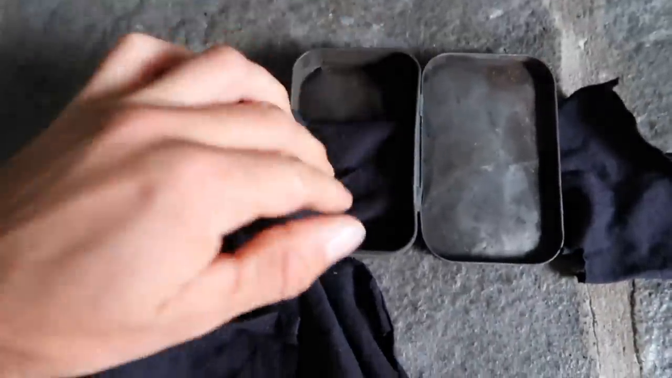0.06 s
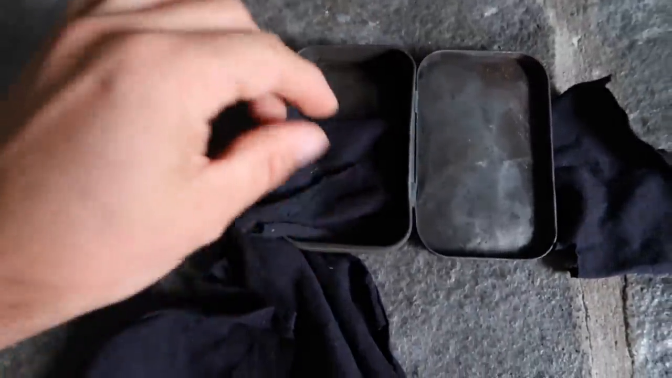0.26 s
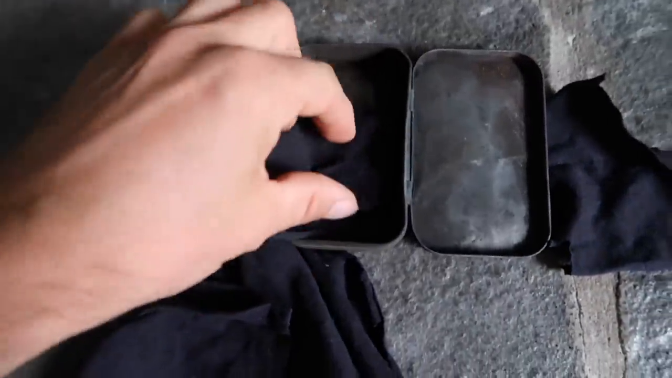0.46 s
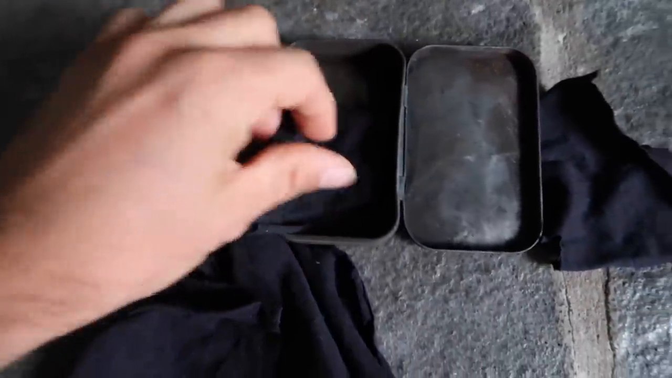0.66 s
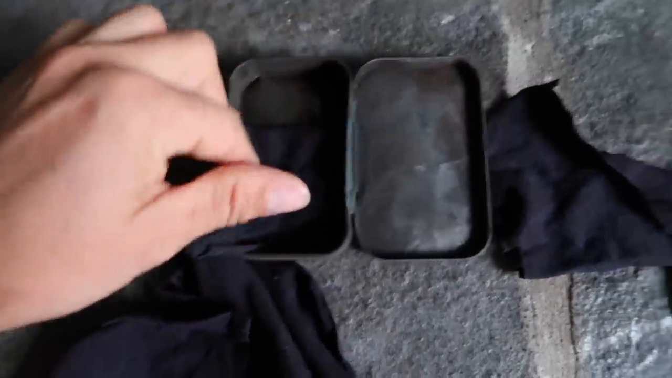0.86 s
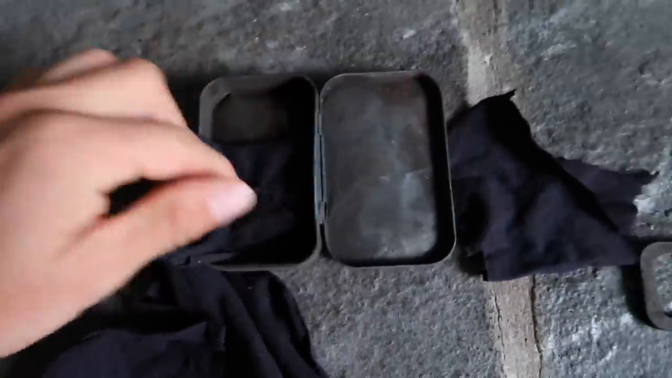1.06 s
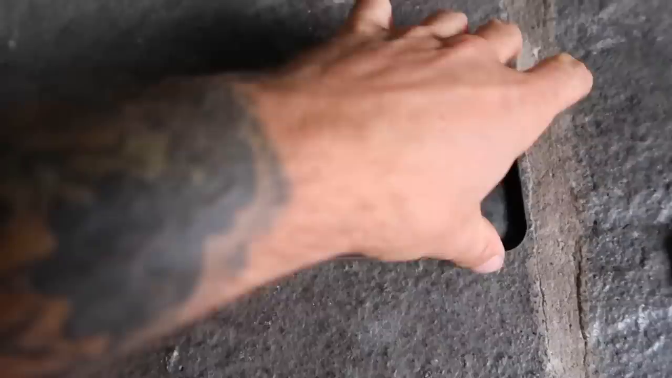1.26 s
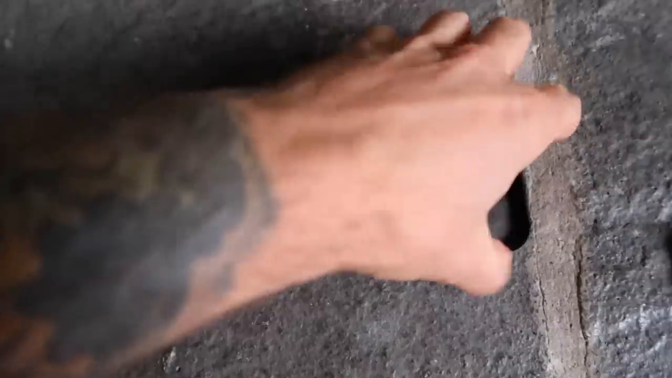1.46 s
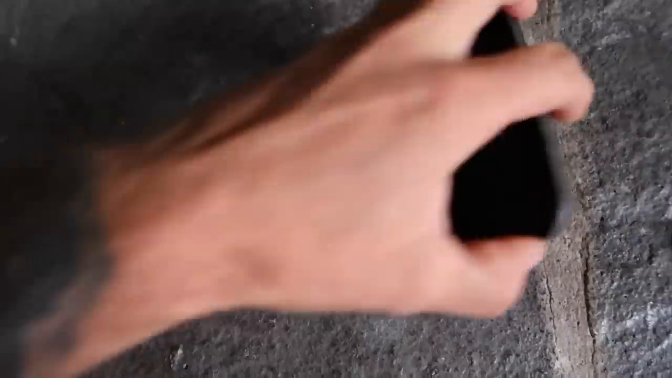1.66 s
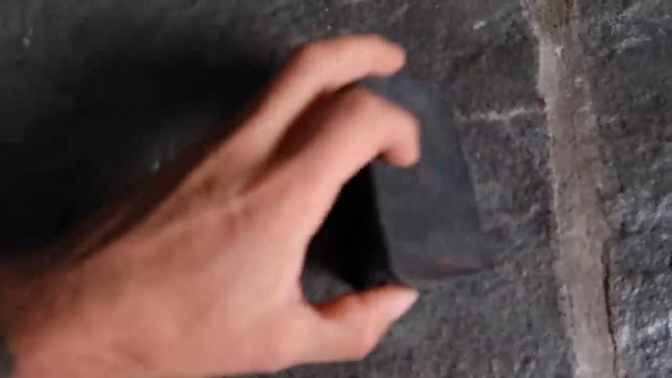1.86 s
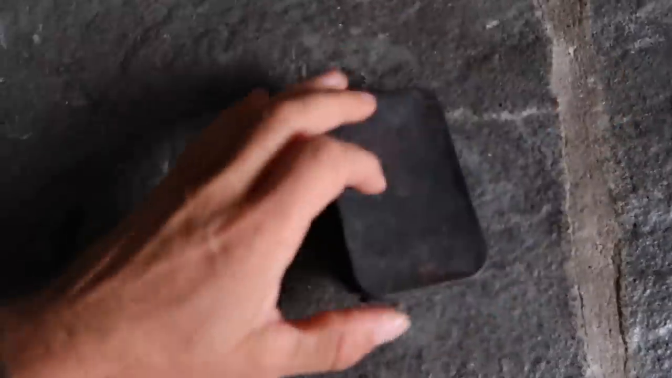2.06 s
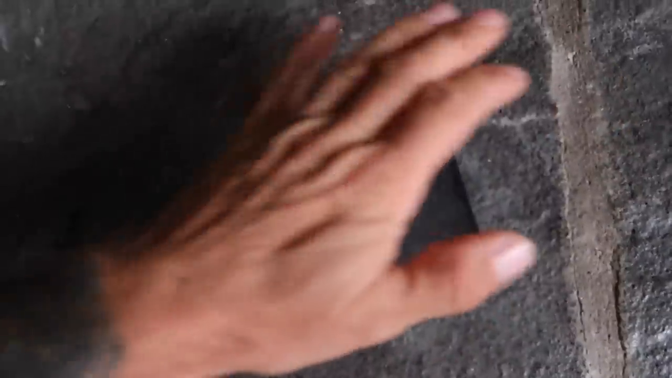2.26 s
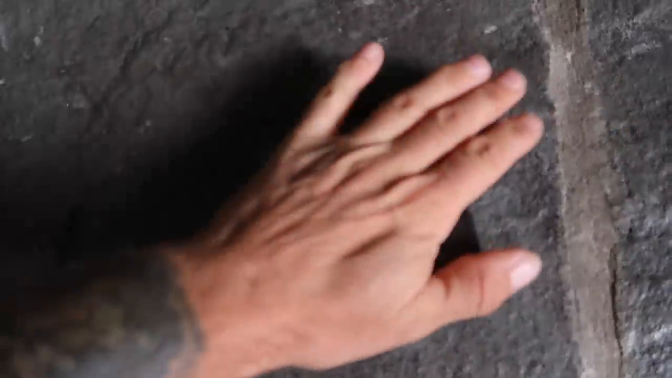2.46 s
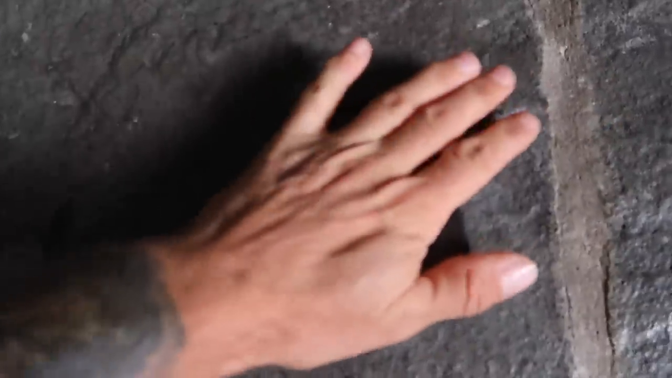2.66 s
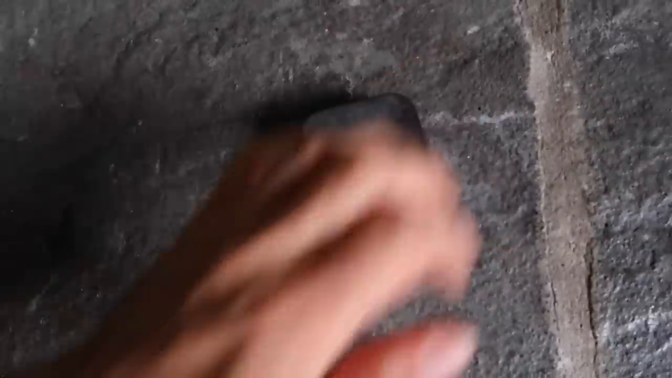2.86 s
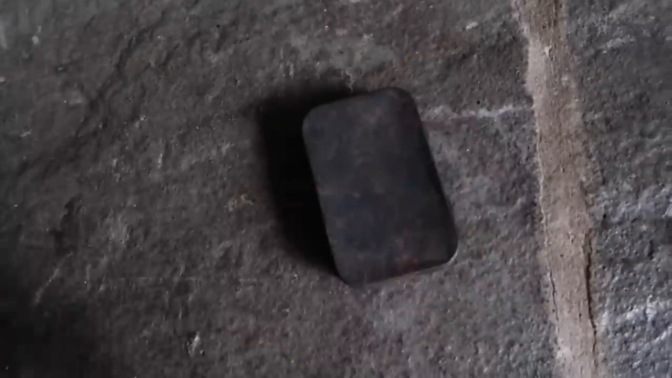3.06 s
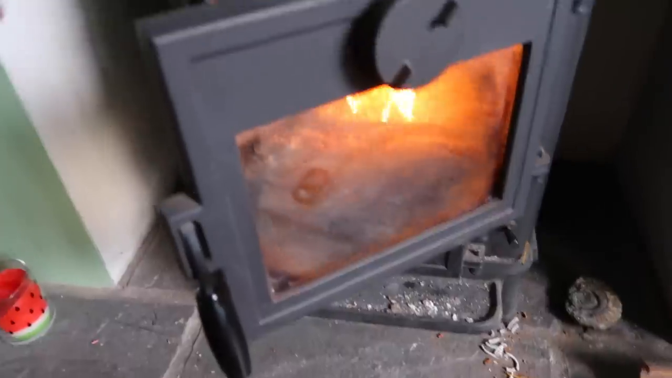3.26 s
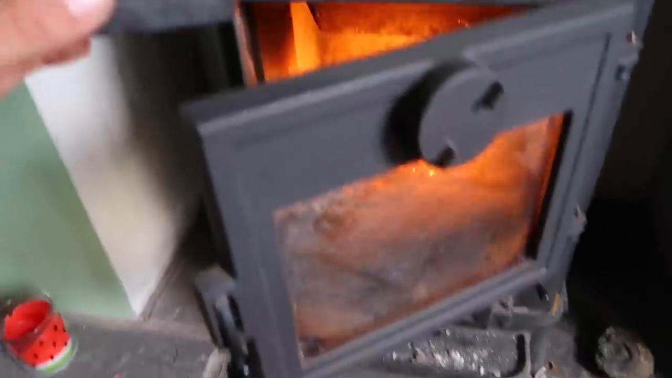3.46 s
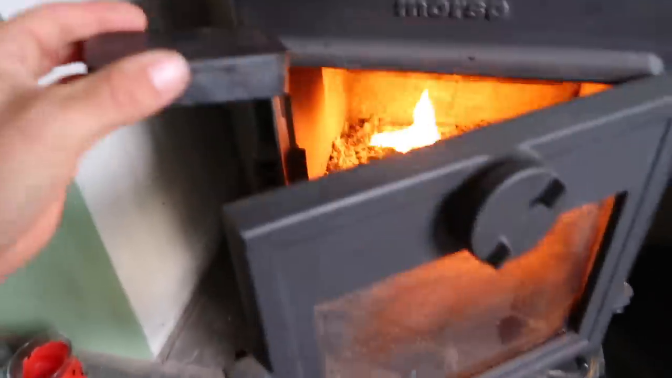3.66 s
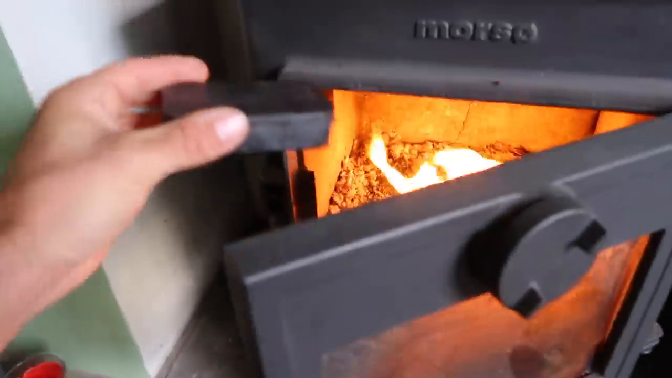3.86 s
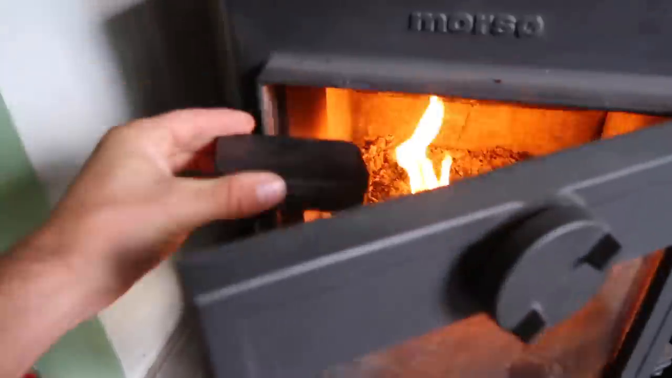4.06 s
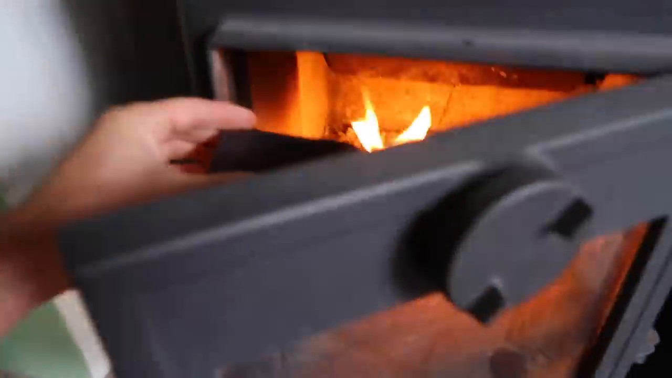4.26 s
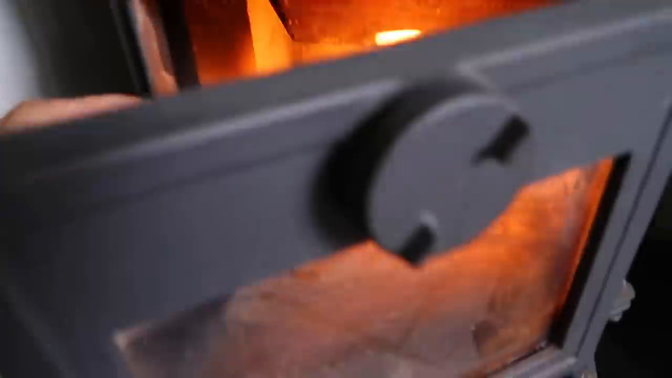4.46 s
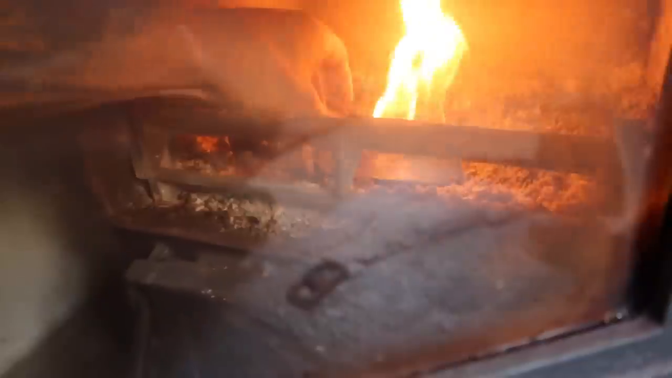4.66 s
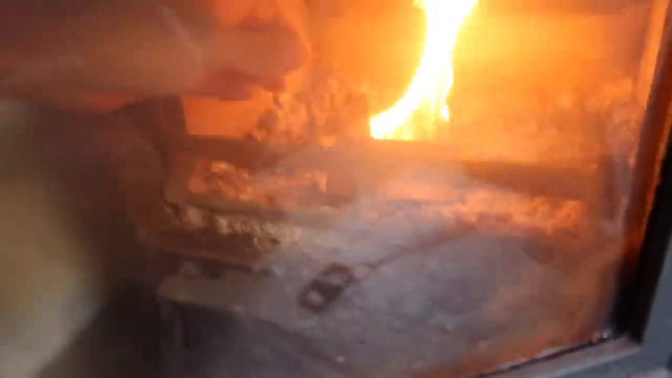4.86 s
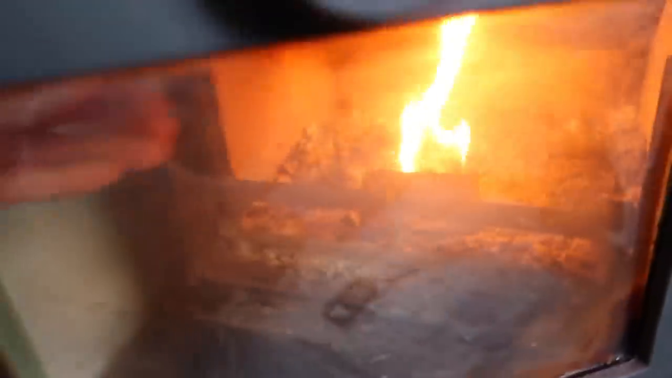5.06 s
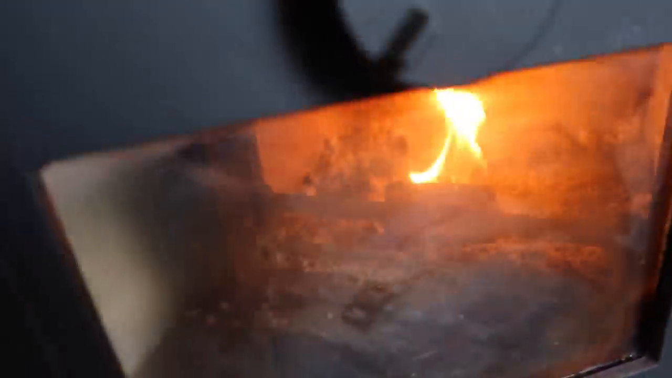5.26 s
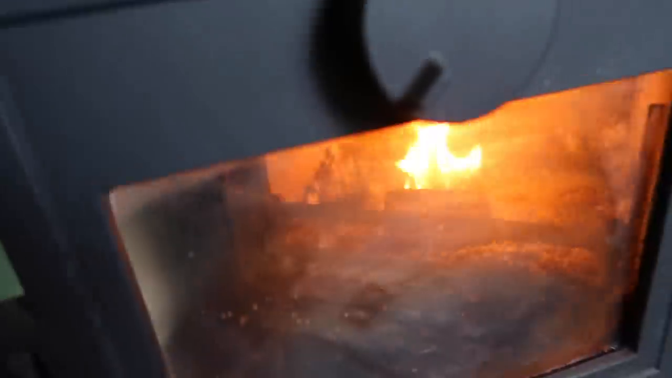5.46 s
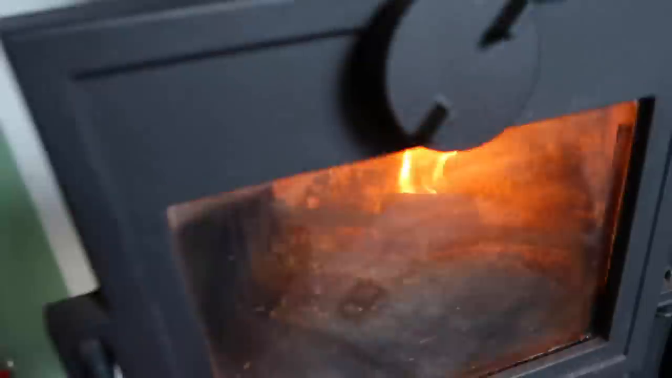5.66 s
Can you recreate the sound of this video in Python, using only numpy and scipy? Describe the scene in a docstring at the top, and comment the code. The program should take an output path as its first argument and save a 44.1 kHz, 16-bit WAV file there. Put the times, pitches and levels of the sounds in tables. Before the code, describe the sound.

A small room with quiet, soft room tone and a barely perceptible very high whine. Until about 0.8 s there is almost nothing but a faint tick and a light scrape. At 0.85-0.95 s a tin lid clacks in a quick, bright cluster. From 1.5 to 2.2 s come irregular thin sheet-metal knocks and sliding scrapes, with short high squeaks near 1.65, 1.73 and 1.87 s. At 2.45-2.6 s the lid is pressed shut with duller, hollow clicks and a small thump on stone; a last knock falls at 2.8 s. From 3.1 s fluttering low handling rumble, soft hiss and faint fire crackle appear. At 4.7 s iron knocks, then at 4.84 s the heavy stove door slams, by far the loudest event, cutting off the fine crackle and leaving a low, beating metallic hum around 400 Hz. Faint handle rubs and dull clicks follow at 5.4-5.7 s.

```python
"""A small metal tin on a stone hearth, close by: its lid knocks, scrapes, squeaks and is pressed shut.
Then it goes into a burning wood stove, whose cast-iron door knocks, clunks shut and rings on.
Tin and door are bursts of contact noise filtered by plate resonances; squeaks and ring are sines.
Random clicks give the crackle of the wood, noise the low rumble of the handled camera and a soft hiss.
Under them lie the tone of a small room, as coloured noise, and a faint, very high tone.
"""
import sys
import numpy as np
from scipy import signal
from scipy.fft import rfft, irfft
from scipy.io import wavfile
from scipy.ndimage import uniform_filter1d, minimum_filter1d

SR = 44100
rng = np.random.default_rng(int(sys.argv[2]) if len(sys.argv) > 2 else 0)


def store_wav(level_fs):
    """Save 16-bit WAV to argv[1]."""
    pcm = np.round(np.clip(np.atleast_2d(level_fs), -1, 1) * 32767)
    wavfile.write(sys.argv[1], SR, pcm.T.astype(np.int16))


N = 251811

# the door comes home [s]
SLAM_S = 4.839


def tin():
    """Knocks and strokes ring the same sheet steel; the rim squeaks, and the closed tin thumps on the stone."""
    # knocks of lid and tin: (time [s], level [dB], rattle t60 [s], grip [dB], brightness [dB],
    # favoured ring [Hz])
    tin_knocks = [ (0.042, -46, 0.11, -5, 11.5, 3650), (0.8516, -28, 0.07, 1, -7, 1540),
                  (0.873, -17.5, 0.13, 3.5, -4.5, 1540), (0.904, -14.5, 0.12, 0, 5, 1380),
                  (0.920, -17.5, 0.18, -11, 10.5, 2830), (0.931, -6.5, 0.021, 5, -3, 1990),
                  (0.9359, -11.5, 0.065, -8, 16, 1800), (1.034, -33.5, .05, -4.5, -8, 1180),
                  (1.477, -19, 0.066, -5.5, -1, 3040), (1.5462, -13.5, 0.079, -8, -4.5, 1924),
                  (1.611, -25, 0.19, -1.5, 2, 2120), (1.6377, -17.5, 0.14, -4.5, 1, 1953),
                  (1.746, -22.5, 0.084, 4, -8.5, 1776), (1.8666, -14.5, 0.07, -5, 0.5, 1800),
                  (1.953, -35.5, 0.024, -11.5, -17, 1250), (1.999, -12.5, 0.096, 4, 4.5, 2163),
                  (2.0209, -12.5, 0.069, 2.5, 1, 1230), (2.076, -19.5, 0.047, 0.5, 0.5, 982),
                  (2.118, -28.5, 0.16, 11.5, -6, 986), (2.1668, -16.5, 0.083, 7.5, -4.5, 1788),
                  (2.457, -31.5, 0.11, 29, -21.5, 960), (2.4828, -12.5, 0.011, 29.5, -1.5, 1010),
                  (2.489, -18, 0.015, 17, 2.5, 1557), (2.510, -21, 0.048, 32, 4, 880),
                  (2.5236, -17, 0.031, 13.5, 6, 1736), (2.560, -21.5, .08, 25.5, -0.5, 726),
                  (2.598, -20.5, 0.039, 29.5, 1, 632), (2.604, -23.5, 0.019, 10.5, 7, 1146),
                  (2.793, -20, 0.058, 11.5, -1, 2380)]
    # the lid sliding on stone and on the rim: (time [s], level [dB], rise [s], fade t60 [s], grip [dB],
    # brightness [dB], favoured ring [Hz])
    tin_slides = [ (0.576, -30, 0.026, 0.14, 9, -4, 1360), (0.850, -21, 0.042, 0.19, 0.5, 1, 2820),
                  (1.370, -36, 0.0096, 0.15, 1, 4, 1900), (1.528, -28, 0.018, 1, -8.5, -4, 1300),
                  (1.640, -30, 0.045, 0.3, -1, -5, 1860), (1.729, -30, 0.0064, 0.17, -9.5, -22, 1300),
                  (1.798, -36, 0.023, 0.1, -1.5, 0.5, 1200), (1.875, -39, .01, 0.9, 1, -5.5, 1200),
                  (1.960, -29, 0.075, 0.29, 15.5, 8, 1194), (2.172, -33.5, 0.027, 0.14, 7.5, -2, 930),
                  (2.464, -20.5, 0.029, 0.3, 17.5, 7, 746), (2.582, -19, 0.023, 0.067, 29.5, 8.5, 630),
                  (2.767, -29.5, 0.011, 0.086, 16, -4.5, 1000), (2.795, -30.5, 0.011, 0.16, 6, -10, 1260)]
    # smooth response of thin sheet steel: (frequency [Hz], gain [dB])
    tin_body = [(80, -41.5), (300, -18.5), (550, -20), (800, -13), (1250, -3.5), (1900, 0), (2600, -7.5),
                (3300, -5.5), (4000, -14.5), (5200, -18.5), (7000, -29.5), (10000, -32.5), (15000, -44.5)]
    # its stronger modes, before the hand damps them: (frequency [Hz], width [Hz], lift [dB])
    tin_modes = [(763, 13, 6.5), (930, 22, 6.5), (1138, 31, 8.5), (1239, 27, 8.5), (1353, 16, 10.5),
                 (1540, 10, 6.5), (1718, 18, 10), (1805, 18, 9), (1940, 16, 6), (2157, 16, 9.5),
                 (2366, 43, 5), (2455, 18, 10.5), (2805, 14, 11), (3000, 24, 9.5), (3080, 22, 5.5),
                 (3433, 10, 9.5), (3670, 47, 10.5), (4245, 30, 6.5), (5000, 45, 6), (5230, 110, 7.2),
                 (6050, 40, 7), (6360, 68, 9), (6810, 50, 13)]
    # the rim sticks and sings as the lid is dragged over it: (time [s], level [dB], rise [s],
    # fade t60 [s], pitch [Hz])
    rim_squeaks = [(1.636, -22, 0.018, 0.11, 3385), (1.728, -29.5, 0.022, 0.083, 3370),
                   (1.809, -45, 0.0074, 0.086, 3400), (1.867, -22, 0.0023, .04, 5240)]
    knock_ring_db, slide_ring_db = 15, 14  # lift of the mode nearest to the contact

    out = np.zeros((2, N))
    for s, db, t60, *contact in tin_knocks:
        knock = (s, db, t60, *gripped(*contact, knock_ring_db))
        add(out, *strike(knock, tin_body, tin_modes, crack=0.13, push=.6))
    for s, db, rise, t60, *contact in tin_slides:
        tone = gripped(*contact, slide_ring_db)
        add(out, *rub((s, db, rise, t60), tone, tin_body, tin_modes, slips_per_s=5000, clump_db=1.86))
    for squeak in rim_squeaks:
        add(out, *sing(*squeak))
    # the pressed tin bottoms out on the stone
    add(out, *sing(s=2.6005, db=-22.5, rise=0.0027, t60=0.02, hz=223.2))
    add(out, .0056, amp(-25.5) * out)  # echo from a surface beside the hearth
    return out + amp(-16.0) * room(out, t60_scale=2.1)


def door():
    """The latch strikes first and the heavy plate follows; the slam leaves the stove humming in close, beating modes."""
    # blows of the stove door and its latch: (time [s], level [dB], rattle t60 [s], thud [dB],
    # hollow [dB], brightness [dB], favoured ring [Hz], its lift, sign ignored [dB])
    door_blows = [ (4.706, -16, 0.16, -7, -10, 3.5, 4000, -1), (4.71, -12.5, 0.084, 2, -6, 3, 447, 12),
                  (4.8337, -20.5, 0.05, -7, 2, 20, 2000, -1),
                  (4.8368, -5.5, 0.035, -25, -4, 3.5, 2810, 9.5), (4.839, 0, 0.091, 7.5, 6, 12.5, 447, 4),
                  (4.867, -12, 0.26, 1, -0.5, 5, 2900, 0), (5.434, -48, 0.081, -10, -8, -11, 1240, 15),
                  (5.479, -35.5, 0.12, 22, -4, -33, 394, 27), (5.586, -42.5, 0.029, 12, -1, -11, 2190, 17),
                  (5.682, -44.5, 0.062, 8, -6, 17, 1730, 29), (5.697, -33.5, 0.13, 19, -11, -0.5, 204, 30)]
    # smooth response of the iron door: (frequency [Hz], gain [dB])
    door_body = [(60, -18.5), (150, -16), (230, -2.5), (320, -7), (450, 3), (650, -2), (820, 5.5),
                 (1050, -9), (1400, -3), (1830, -10.5), (2750, -5.5), (3600, -18.5), (4700, -24.5),
                 (9000, -44.5), (13000, -66)]
    # its modes, before the contact damps them: (frequency [Hz], width [Hz], lift [dB])
    door_modes = [(228, 22, 11.5), (444, 36, 13), (574, 18, 6.5), (764, 44, 8.5), (834, 30, 2.5),
                  (1013, 14, 3.6), (1227, 59, 10.5), (1530, 11, 2.5), (1643, 40, 8.5), (2002, 27, 10),
                  (2174, 36, 6), (2510, 59, 4.5), (2563, 32, 7.5), (2870, 36, 7), (3094, 26, 8.5),
                  (3250, 30, 6.5), (4013, 8.4, 8), (4220, 32, 7), (4580, 140, 5)]
    # the handle rubbing on its catch: (time [s], level [dB], rise [s], fade t60 [s])
    latch_rubs = [(5.428, -41.5, 0.008, 0.087), (5.447, -40.5, 0.0047, 0.29), (5.678, -51, 0.0096, 0.26)]
    # colour of that rubbing: (thud [dB], hollow [dB], brightness [dB], favoured ring [Hz], its lift [dB])
    latch_tone = (8.5, -8, -23, 1253, 25)

    out = np.zeros((2, N))
    for blow in door_blows:
        add(out, *strike(blow, door_body, door_modes, crack=0.12, push=0.65))
    for stroke in latch_rubs:
        add(out, *rub(stroke, latch_tone, door_body, door_modes, slips_per_s=2000, clump_db=1.5))
    out += amp(-7.5) * room(out, t60_scale=2.36)
    add(out, SLAM_S, stove_hum())
    return out


def stove_hum():
    """Long-ringing modes of the shut stove die away as sines; those close in pitch beat together."""
    # (frequency [Hz], level [dB], t60 [s])
    stove_ring = [(345, -39.5, 1.7), (401.7, -31.5, 2.1), (409.3, -29.5, 2.25), (425.3, -37, 1.9),
                  (480, -46, 1.1), (570, -46.5, 2.2), (626, -46.5, 1.8), (645, -46.5, 1.6),
                  (824, -49.5, 2.6), (1135, -40, 1.02), (1290, -47.5, 1.6), (1357, -48.5, 1.5),
                  (1610, -55.5, 2.9), (2030, -47, 0.99)]
    t = np.arange(N) / SR
    hum = np.zeros(N)
    for k, (hz, db, t60) in enumerate(stove_ring):
        direction = (-1) ** k  # neighbouring modes swing in opposite directions
        hum += direction * amp(db - 60 * t / t60) * np.sin(2 * np.pi * hz * t)
    return hum


def fire():
    """The wood crackles and snaps, as clicks of one colour, until the door shuts it in."""
    # loudest snaps of the wood: (time [s], level [dB], brightness [dB])
    snaps = [(3.2007, -53, -10), (3.6064, -52, -5), (3.8654, -59, 9), (4.1537, -58.5, 5), (4.187, -58, 0),
             (4.2707, -52.5, -2), (4.44, -64, 7), (4.4854, -57, -3), (4.52, -57.5, -3)]
    # colour of a snap: (frequency [Hz], gain [dB])
    snap_body = [(150, -28.5), (800, -3.5), (2000, -19.5), (5000, -16.5), (11000, -18.5), (15000, -26.5)]
    # fine crackle, heard through the open door
    crackles_per_s, crackle_db, crackle_spread_db = 440, -68.5, 3
    snap_t60_s = 0.036

    happens = rng.random(N) < crackles_per_s / SR
    strength = amp(crackle_spread_db * np.minimum(rng.exponential(1, N), 4))
    pops = rng.standard_normal((2, N)) * happens * strength
    colour = response(read(snap_body, bins(size=1024)))
    crackle = signal.fftconvolve(pops, colour[None], axes=1)[:, :N]
    door_open = np.arange(N) / SR < SLAM_S
    out = amp(crackle_db) * near_stove() * door_open * evened(crackle + room(crackle, t60_scale=.3))

    for s, db, bright_db in snaps:
        snap = (s, db, snap_t60_s, 0, 0, bright_db, 1200, 3)
        add(out, *strike(snap, snap_body, [], crack=0.59))
    return out


def handling():
    """Low, fluttering rumble of the handled camera, with swells, over a soft hiss: one coloured noise."""
    # colour of rumble and hiss: (frequency [Hz], relative density [dB per Hz])
    rumble_spectrum = [(15, -55), (25, -12), (96, 3), (193, -25), (227, -15), (389, -14.5), (614, -25),
                       (848, -22), (1170, -27.5), (1850, -29), (2010, -30), (7910, -52), (11500, -45),
                       (15500, -58)]
    # the rumble swells: (time [s], lift [dB])
    rumble_swells = [(3.25, 8), (3.66, 7.5), (3.88, 1.5), (4.28, 1), (4.6, 0.5), (5.48, 5)]
    rumble_db, flutter_db = -52.5, 1.1  # level before the swells, rms of the flutter
    swell_s = 0.067  # half length of a swell

    t = np.arange(N) / SR
    flutter_hz = np.geomspace(4, 25, 20)
    flutter = evened(sum(np.sin(2 * np.pi * (f * t + rng.random())) for f in flutter_hz))
    swells = sum(db * np.exp(-((t - s) / swell_s) ** 2) for s, db in rumble_swells)
    return near_stove() * noise(rumble_spectrum) * amp(rumble_db + swells + flutter_db * flutter)


def near_stove():
    """Gain that rises from 0 to 1 as the microphone comes up to the stove."""
    near_s, approach_s = 3.12, 0.094
    return np.clip((np.arange(N) / SR - near_s) / approach_s, 0, 1)


def background():
    """Room tone is coloured noise; a faint, very high tone is a sine of wandering phase."""
    # colour and level of the room tone: (frequency [Hz], relative density [dB per Hz]), rms [dB]
    room_tone, room_tone_db = [(12, -46.5), (20, -19), (59, -4), (298, -12.5), (324, -14), (427, -14.5),
                               (465, -15), (811, -20.5), (932, -18.5), (1040, -21.5), (1770, -24),
                               (2610, -27), (3640, -28.5), (12000, -42.5), (15000, -70)], -54.5
    high_hz, high_db = 13010, -81
    wander = 1.5 * noise([(0, -3), (15, 2.5), (60, -38.0), (300, -120)])  # radians
    high_tone = np.sin(2 * np.pi * high_hz * np.arange(N) / SR + wander)
    return amp(room_tone_db) * noise(room_tone) + amp(high_db) * high_tone


def gripped(grip_db, bright_db, ring_hz, ring_db):
    """A tighter grip makes the tin sound more hollow and passes more thud to the stone."""
    loose_thud_db, thud_per_grip = -4, 0.52
    return loose_thud_db + thud_per_grip * grip_db, grip_db, bright_db, ring_hz, ring_db


def strike(row, body, modes, crack, push=0):
    """One blow on a plate; its level is that of its energy packed into 10 ms."""
    s, db, t60, *tone = row
    size = amp(db) * np.sqrt(.01 * SR)
    contact = rattle(t60, crack, push)
    return s, size * signal.fftconvolve(contact, plate(body, modes, *tone)[None], axes=1)


def rattle(t60, crack, push, chatter_db=3, push_s=0.00039, size=16384):
    """First contact, its dull push and fast-dying, uneven micro-bounces, even in colour; a mid and a side version."""
    t = np.arange(size) / SR
    bounces = evened(uniform_filter1d(rng.standard_normal(size), size=80))
    fade = amp(chatter_db * bounces - 60 * t / t60)
    x = rng.standard_normal((2, size)) * fade / np.linalg.norm(fade)
    x[0, 0] += crack
    x[0] += push * np.exp(-t / push_s) / (push_s * SR)
    z = rfft(x)
    z /= np.sqrt(uniform_filter1d(abs(z) ** 2, size=90, axis=1))  # evens out the colour
    return irfft(z)[:, :size // 2]


def rub(stroke, tone, body, modes, slips_per_s, clump_db, size=32768):
    """A stroke of tiny slips, which come in clumps, rings a plate."""
    s, db, rise, t60 = stroke
    pressure = amp(db) * swell(np.arange(size) / SR, rise, t60)
    clumps = amp(clump_db * evened(uniform_filter1d(rng.standard_normal(size), size=250)))
    happens = rng.random(size) < slips_per_s / SR
    slips = evened(clumps * rng.standard_normal((2, size)) * happens)
    return s, signal.fftconvolve(slips * pressure, plate(body, modes, *tone)[None], axes=1)


def sing(s, db, rise, t60, hz, size=16384):
    """One mode sounds alone, a little unsteady in pitch."""
    wobble_hz = 12 * evened(uniform_filter1d(rng.standard_normal((2, size)), size=200))
    phase = 2 * np.pi * np.cumsum(hz + wobble_hz, axis=1) / SR
    level = amp(db) * swell(np.arange(size) / SR, rise, t60)
    return s, level * np.sqrt(2) * np.sin(phase)


def swell(t, rise, t60):
    """Pressure builds evenly, then dies away."""
    return np.clip(t / rise, 0, 1) * amp(-60 * np.maximum(t - rise, 0) / t60)


def plate(body, modes, thud_db, hollow_db, bright_db, ring_hz, ring_db):
    """A plate's answer to one contact; the less the favoured mode is damped, the taller and narrower it stands."""
    hz = bins(size=16384)
    damping = 1 + 0.028 * max(hollow_db, 0)  # a firm contact also damps the modes
    damped = [(f, width * damping, db / damping) for f, width, db in modes]
    favoured = (ring_hz, damping * (14 + 130 / amp(abs(ring_db))), ring_db)
    contact = touch(hz, thud_db, hollow_db, bright_db)
    return response(read(body, hz) + lift([*damped, favoured], hz) + contact)


def touch(hz, thud_db, hollow_db, bright_db):
    """A firm, flat contact brings out the lows; a hard edge brings out the highs."""
    return read([(300, thud_db), (780, hollow_db), (1750, 0), (2400, 0), (5500, bright_db)], hz)


def lift(modes, hz):
    """Resonance peaks in dB over a plate's smooth response."""
    power = 1
    for f, width, db in modes:
        power = power + (amp(abs(db)) ** 2 - 1) / (1 + (2 * (hz - f) / width) ** 2)
    return 10 * np.log10(power)


def response(db):
    """The causal impulse response, of energy 1, that has the shape of this gain curve."""
    log_gain = np.log(amp(np.r_[db, db[-2:0:-1]]))
    # the phase of a minimum-phase filter follows from its gain
    taps = np.fft.ifft(np.exp(np.conj(signal.hilbert(log_gain)))).real[:len(db)]
    return taps / np.linalg.norm(taps)


def room(x, t60_scale):
    """Reflections from near walls, each band dying at its own speed."""
    # decay time before t60_scale: (frequency [Hz], t60 [s])
    room_t60 = [(150, 0.3), (500, 0.15), (1500, 0.14), (4000, 0.078), (12000, 0.15)]
    size = SR // 2
    taps = rng.standard_normal((2, size)) * (rng.random((2, size)) < .1)  # sparse reflections
    hz, t, z = signal.stft(taps, SR, nperseg=256)
    t60 = t60_scale * read(room_t60, hz)[:, None]
    tail = signal.istft(z * amp(-60 * t / t60), SR)[1]
    tail *= np.clip(np.arange(tail.shape[1]) / SR / 0.0047, 0, 1) ** 2  # builds up over 4.7 ms
    return signal.fftconvolve(x, tail / np.linalg.norm(tail[0]), axes=1)[:, :N]


def noise(spectrum):
    """Steady mid and side noise of rms 1."""
    return evened(irfft(rfft(rng.standard_normal((2, N))) * amp(read(spectrum, bins(N))), N))


def amp(db):
    """Decibels to gain."""
    return 10 ** (np.asarray(db) / 20)


def evened(x):
    """Scales to rms 1."""
    return x / np.sqrt(np.mean(x ** 2) + 1e-20)


def read(points, hz):
    """Reads (Hz, value) points on a log-frequency axis."""
    f, value = np.transpose(points)
    return np.interp(np.log(hz + 1), np.log(f + 1), value)


def bins(size):
    """Frequencies of a real transform."""
    return np.fft.rfftfreq(size, 1 / SR)


def add(mix, s, sound):
    """Mixes a sound in at a time."""
    part = mix[:, round(s * SR):][:, :sound.shape[-1]]
    part += sound[..., :part.shape[1]]


def microphones(pair, width, alike, pan_db):
    """Two close ports: their difference is partly the same sound a quarter turn later, partly unrelated."""
    mid, other = rfft(pair)
    alike = np.clip(alike, 0, 1)
    side = amp(read(width, bins(N))) * (-1j * alike * mid + np.sqrt(1 - alike ** 2) * other)
    return irfft(np.array([mid + side, mid - side]), N) * amp([[pan_db / 2], [-pan_db / 2]])


def scene():
    """Tin, stove, handling and room at the two ports."""
    # side minus mid, for close sources and for the diffuse rest: (frequency [Hz], level [dB])
    near_width = [(60, -33), (500, -28.5), (1000, -23.5), (2000, -13.5), (4000, -9), (8000, -1.5),
                  (13000, 6.5)]
    diffuse_width = [(30, -24.5), (110, -16.5), (200, 0.5), (500, 0), (2000, -3), (13000, 1.5)]
    diffuse = fire() + handling() + background()
    return (microphones(tin(), near_width, alike=.4, pan_db=-1.04)
            + microphones(door(), near_width, alike=0.13, pan_db=0.36)
            + microphones(diffuse, diffuse_width, alike=0, pan_db=0))


def record(dry):
    """Gain control ducks at the hardest blows and recovers slowly; a fast limiter holds the peaks; then the band limit."""
    ceiling_db, recover_db_per_s, edge_hz = -9, 14, 15000
    power_db = 10 * np.log10(abs(uniform_filter1d((dry ** 2).mean(0), size=180)) + 1e-12)
    recovery = recover_db_per_s * np.arange(N) / SR
    held_db = np.maximum.accumulate(power_db + recovery) - recovery  # falls steadily after each peak
    over_db = np.maximum(held_db - ceiling_db, 0)
    ducked = dry * amp(-uniform_filter1d(over_db, size=60))

    lowpass = signal.firwin(511, edge_hz, window=("kaiser", 9), fs=SR)[None]
    peak = abs(signal.oaconvolve(ducked, lowpass, "same")).max(0)
    limit = minimum_filter1d(1 / np.maximum(peak / .97, 1), size=181)
    gain = uniform_filter1d(limit, size=181)
    return signal.oaconvolve(ducked * gain, lowpass, "same")


dry = scene()
out = record(dry)
store_wav(out)
```